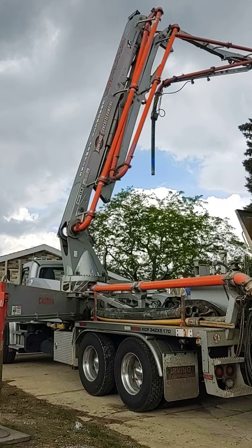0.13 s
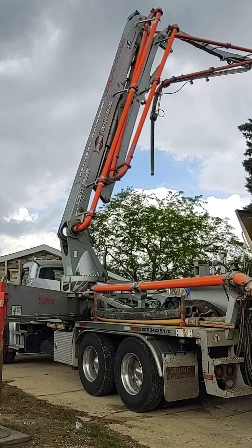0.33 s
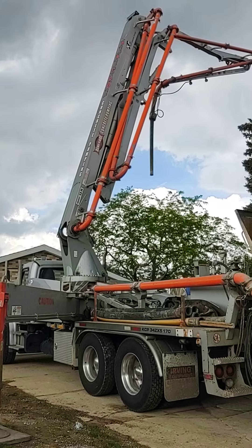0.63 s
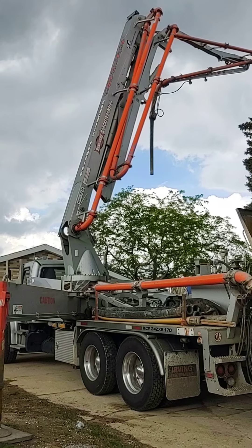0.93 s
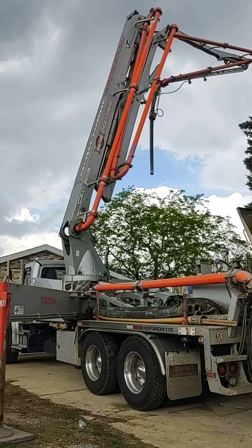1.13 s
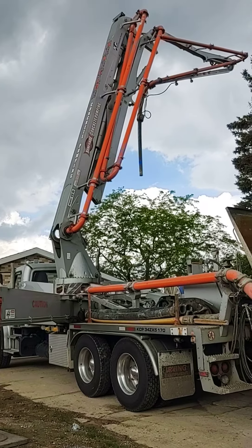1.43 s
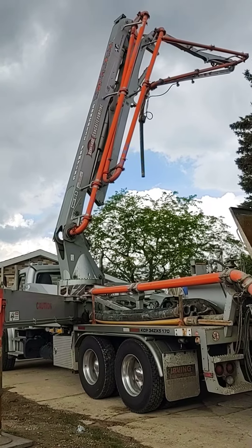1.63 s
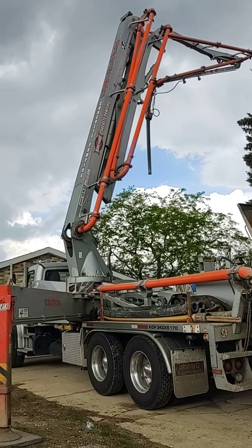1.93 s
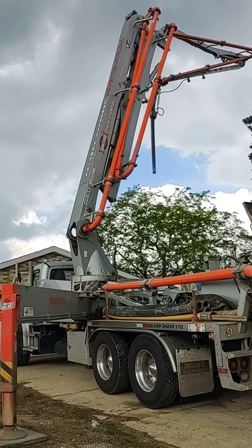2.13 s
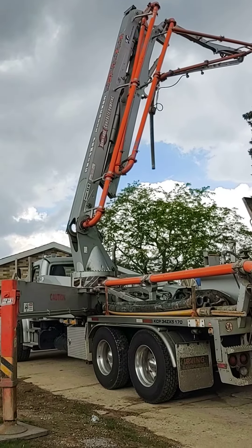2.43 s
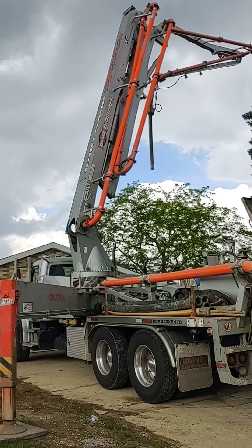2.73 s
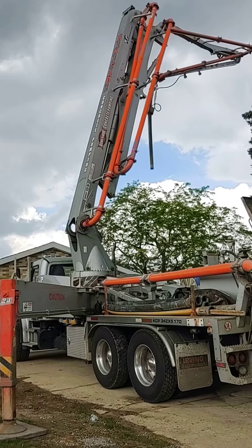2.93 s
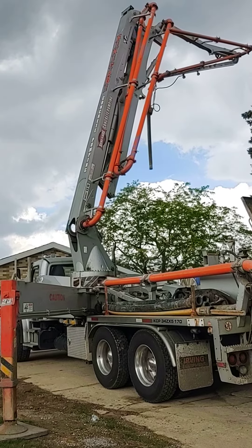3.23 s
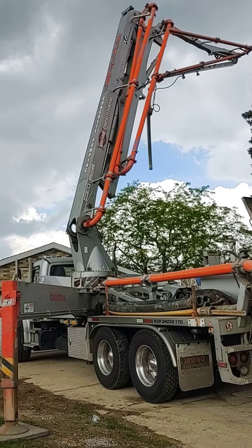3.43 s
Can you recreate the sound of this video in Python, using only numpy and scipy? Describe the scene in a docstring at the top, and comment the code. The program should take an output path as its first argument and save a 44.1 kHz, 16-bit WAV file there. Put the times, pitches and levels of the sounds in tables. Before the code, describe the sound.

Steady diesel machinery drone from a pump truck swells quickly, whines and hisses, then eases off.

```python
"""A droning diesel with whines, roar and oil hiss starts abruptly but low, swells, peaks and settles.
A pump truck stands a few metres from a phone, its six-cylinder engine held at a nearly steady speed.
Engine hum, oil pump and gear pair are sine waves locked to the engine cycle; clatter is noise repeated
each cycle. Machinery roar, fan and valve are shaped noise; the wind is noise with its treble removed."""
import sys
import numpy as np
from scipy import signal
from scipy.fft import rfft, irfft, next_fast_len
from scipy.io import wavfile

SR = 44100
rng = np.random.default_rng(int(sys.argv[2]) if len(sys.argv) > 2 else 0)


def wav_out(sig):
    """Save sig, one row per channel (or a flat mono array), as 16-bit PCM at SR to the path in sys.argv[1]."""
    wavfile.write(sys.argv[1], SR, np.round(np.clip(np.atleast_2d(sig).T, -1, 1) * 32767).astype(np.int16))


N = 157437

CYCLE_HZ = 8.3762  # engine cycles a second; one cycle is two crank turns
START_S = .1  # silence before this time

# How loud the main layers are over time; fan and hiss are trimmed later, bass counts against its mean:
# (time [s], machine and wind [dB], bass against machine [dB], fan roar [dB], valve hiss [dB])
LEVELS = [(.1, -46, 5, -56, -61), (.115, -37, -3, -49.5, -52), (.21, -28.5, -7.5, -42.5, -41),
          (.38, -21.5, -7, -36.5, -35.5), (.6, -24.5, -5.5, -40, -35.5), (.81, -26.5, -2, -47, -34.5),
          (1.08, -29, -2.5, -41, -37.5), (1.4, -30, 0.5, -53, -36.5), (1.7, -30.5, -1.5, -49.5, -37.5),
          (1.95, -31, -3, -49, -40), (2.15, -30.5, -4.5, -48.5, -42.5), (2.35, -31, -5, -45, -48.5),
          (2.7, -31, -5, -46.5, -54), (3.1, -31.5, -5, -46, -51), (3.57, -33, 1, -46, -58)]
# How the tone colour changes over time:
# (time [s], opening-valve hiss [dB], upper gear whine against machine [dB],
#  band near 350 Hz against machine [dB])
COLOURS = [(.1, -50.5, 7, -15), (.2, -40, 0.5, -4), (.4, -33.5, -0.5, -5.5), (.68, -37, 3.5, -2.5),
           (.78, -43, 3, -2), (1., -51, 1, -1), (1.4, -60, -0.5, 4), (1.9, -64, 2.5, 1), (2.4, -73, 2, -5),
           (2.9, -58, -3, -1), (3.57, -68, 1, 1)]


def undb(db):
    """Turn decibels into a plain gain."""
    return 10 ** (np.asarray(db) / 20)


def curve(table, hz):
    """Read a table of (frequency [Hz], value) between its points, on a log frequency axis."""
    points = np.array(table)
    return np.interp(np.log(np.maximum(hz, 1)), np.log(points[:, 0]), points[:, 1])


def track(column, table=LEVELS):
    """Read one column of a table over time, giving a value for every sample."""
    points = np.array(table)
    return np.interp(np.arange(N) / SR, points[:, 0], points[:, column])


def walk(rate_hz):
    """Random levels, rate_hz of them a second, joined by smooth steps; their spread is near 1."""
    at = np.arange(0, N + 64, 64) * rate_hz / SR  # worked out every 64 samples
    k = at.astype(int)
    level = rng.standard_normal(int(at[-1]) + 2)
    step = .5 - .5 * np.cos(np.pi * (at - k))
    smooth = level[k] * (1 - step) + level[k + 1] * step
    return 1.2 * np.interp(np.arange(N) * rate_hz / SR, at, smooth)


def drift_db(hz):
    """Bass and the band near 350 Hz rise and fall against the rest; above 500 Hz nothing drifts."""
    if hz > 500:
        return 0
    low = np.clip(1 - np.log2(hz / 150), 0, 1)
    mid = np.clip(1 - 2 * abs(np.log2(hz / 350)), 0, 1)
    bass_db = track(2)
    return low * (bass_db - np.mean(bass_db)) + mid * track(3, COLOURS)


def tone(turns, order, db, pan_db):
    """A sine wave at a multiple of the engine cycle, its level wavering."""
    lag_s = 5e-5  # the left side hears each tone this much later, besides the lag between the ports
    side = np.array([[-.5], [.5]])  # left, right
    phase = 2 * np.pi * (order * (turns + side * lag_s * CYCLE_HZ) + rng.random())
    waver_db = 1. * walk(3)
    db = db + waver_db + drift_db(order * CYCLE_HZ)
    return np.sin(phase) * undb(db) * undb(-side * pan_db)


def noise(gain_of_hz, low_hz, top_hz, source=None):
    """Stereo noise of rms 1, partly shared by both sides, flickering in bands half an octave apart."""
    # How alike the two sides are: (frequency [Hz], share of power common to both [0-1])
    likeness = [(60, .995), (200, .99), (350, .84), (600, .91), (1200, .75), (2200, .45), (4000, .33),
                (15000, .33)]
    # Left-right balance: (frequency [Hz], left minus right [dB])
    balance = [(60, -2), (110, -1), (200, -4.5), (380, 5.5), (700, 1.5), (1290, -3), (2380, -8.5),
               (4400, -2), (8120, -4.0), (15000, -2)]
    size = next_fast_len(N)
    hz = np.arange(size // 2 + 1) * SR / size
    raw = rng.standard_normal((3, N)) if source is None else source
    spectrum = rfft(raw, size)
    # One shared noise plus a separate noise for each side
    like = np.clip(curve(likeness, hz), 0, 1)
    stereo = np.sqrt(like) * spectrum[0] + np.sqrt(1 - like) * spectrum[1:]
    stereo = stereo * gain_of_hz(hz)
    stereo = stereo * undb(np.array([[.5], [-.5]]) * curve(balance, hz))
    out = 0
    swell_db = .4 * walk(3.06)  # all bands together
    for centre in low_hz * 2 ** np.arange(0, np.log2(top_hz / low_hz), .5):
        band = np.cos(np.pi / 2 * np.clip(2 * np.log2((hz + 1) / centre), -1, 1)) ** 2
        flicker_db = .9 * walk(8.98)  # each band on its own
        band_sound = irfft(stereo * band, size)[:, :N]
        out = out + band_sound * undb(swell_db + flicker_db + drift_db(centre))
    return out / np.sqrt(np.mean(out ** 2))


def peaks(rows):
    """Gain over frequency of resonances given as (frequency [Hz], width [Hz], level [dB])."""
    def gain(hz):
        power = sum(undb(2 * db) / (1 + (2 * (hz - f) / width) ** 2) ** 2 for f, width, db in rows)
        return np.sqrt(power)
    return gain


def engine_hum(turns):
    """Exhaust and block hum at whole multiples of the engine cycle."""
    # Hum lines: (multiple of the engine cycle, level before trim [dB], left minus right [dB])
    orders = [(6, -33, 0), (9, -27, 0), (12, -7, 1), (14, -14, 0), (15, -12, 1), (18, -5, 1), (20, -15, 0),
              (21, -20, 0), (24, -11, 0), (26, -20, 1), (30, -12, 1), (36, -20, 3), (38, -15, 3),
              (39, -18, 3), (40, -16, 2), (42, -16, 4), (47, -20, 3), (60, -17, -6), (64, -22, -3),
              (70, -20, -3), (72, -18, -3), (76, -15, -1), (78, -10, -1), (84, -6, 0), (85, -15, 0),
              (88, -18, 2), (96, -19, 0), (106, -20, 3), (120, -27, 0), (141, -23, -2)]
    trim_db = -1
    return sum(tone(turns, k, db + trim_db, pan) for k, db, pan in orders)


def pump_whine(turns):
    """A nine-piston oil pump, geared to the engine, whines at multiples of its shaft speed."""
    # Pump lines: (multiple of the pump shaft, level before trim [dB], left minus right [dB])
    orders = [(7, -15, 0), (18, -11, 5), (27, -8, -3), (35, -11, -1), (36, -3, -1), (45, -18, 1),
              (180, -27, -4)]
    shaft_ratio, trim_db = 2.5, -.5  # pump turns per engine cycle; trim
    return sum(tone(turns, k * shaft_ratio, db + trim_db, pan) for k, db, pan in orders)


def gear_whine(turns):
    """Meshing gear teeth whine at multiples of the tooth rate, with a sideband on either side."""
    # Gear lines: (multiple of the tooth rate, level [dB],
    #  sidebands one crank turn away against that level [dB], left minus right [dB])
    mesh = [(1, -4.5, -18.5, -3), (2, -5, -13, 0.5), (3, -12.5, -12.5, 5.5), (4, -22, -5, 8.5)]
    teeth_per_cycle = 80
    out = 0
    for k, db, side_db, pan in mesh:
        for step in (-1, 0, 1):
            # Only lines above the first follow the upper-whine track and its rough flutter
            rough_db = 1.2 * walk(25)
            upper_db = (track(2, COLOURS) + rough_db) * (round(k) > 1)
            order = round(k) * teeth_per_cycle + 2 * step
            out = out + tone(turns, order, db + side_db * abs(step) + upper_db, pan)
    return out


def clatter_and_roar(turns):
    """Clatter is noise repeating every engine cycle; roar has the same colour but never repeats."""
    # Colour of both noises: (frequency [Hz], noise level per Hz [dB])
    colour = [(18, -68), (30, -42), (79, -13), (124, -19), (287, -8), (380, -8.5), (458, -14.5),
              (665, -4.5), (758, -4), (1020, -15), (1260, -10.5), (1330, -12), (1540, -15.5), (1790, -17.5),
              (2000, -12.5), (2240, -22), (2600, -25.5), (3380, -50), (5720, -120)]
    clatter_db, roar_db = -9.5, -5
    shape = lambda hz: undb(curve(colour, hz))
    # One stored cycle of noise, read again and again in step with the engine
    cycle = rng.standard_normal((3, 8192))[:, (turns % 1 * 8192).astype(int)]
    clatter = noise(shape, 60, 3500, cycle)
    roar = noise(shape, 60, 3500)
    return undb(clatter_db) * clatter + undb(roar_db) * roar


def machine():
    """Hum, whines, clatter and roar all follow one machine level; the engine speed wanders slightly."""
    speed = 1 + .0003 * walk(1.5)
    turns = np.cumsum(speed) * CYCLE_HZ / SR  # engine cycles so far
    tones = engine_hum(turns) + pump_whine(turns) + gear_whine(turns)
    return (tones + clatter_and_roar(turns)) * undb(track(1))


def fan():
    """The cooling fan's broad air roar, made from shaped noise."""
    # Colour of the air noise: (frequency [Hz], noise level per Hz [dB])
    colour = [(1290, -13), (2200, -11.5), (2630, -3.5), (2900, -1.5), (3190, -3.5), (4340, -11.5),
              (8150, -9.5), (11800, -16), (12800, -18), (15200, -24.5)]
    trim_db = 4
    air = noise(lambda hz: undb(curve(colour, hz)), 1600, 20000)
    return air * undb(track(3) + trim_db)


def valve():
    """Oil hiss coloured by the pipes, with a brighter jet while the valve opens."""
    # Pipe resonances in the hiss: (frequency [Hz], width [Hz], level [dB])
    pipes = [(2970, 140, 1), (3350, 450, -7), (3950, 500, -5), (4850, 350, -6), (5800, 300, -7),
             (6900, 650, -4), (7800, 400, -5.5), (8800, 450, -10), (10300, 1500, -16), (12600, 150, -18)]
    # Resonances of the opening jet: (frequency [Hz], width [Hz], level [dB])
    opening = [(5250, 520, 0), (5570, 91, 5.5), (5840, 180, 3), (8700, 5300, -12.5), (10900, 2600, -22)]
    broad = (5100, 3900, -10.5)  # one wide resonance under the pipes, same columns
    trim_db, pan_db = 2.5, -1  # hiss trim; left minus right, added to the noise's own balance
    flow = noise(peaks(list(pipes) + [broad]), 1600, 20000)
    jet = noise(peaks(opening), 4000, 20000)
    pan = undb(np.array([[.5], [-.5]]) * pan_db)
    return (flow * undb(track(4) + trim_db) + jet * undb(track(1, COLOURS))) * pan


def wind():
    """Faint deep rumble, mostly the same left and right, rising and falling with the machine."""
    mean_db, side_db = -58, -12  # average level; left-right difference against the shared part
    low_pass = signal.butter(2, 40, fs=SR, output="sos")
    mid, side = signal.sosfilt(low_pass, rng.standard_normal((2, N)))
    rumble = mid + undb(side_db) * side * np.array([[1], [-1]])
    level_db = track(1)
    return rumble / np.std(rumble) * undb(mean_db + level_db - np.mean(level_db))


def scene():
    """All the sources together, silent until the start time."""
    return (machine() + fan() + valve() + wind()) * (np.arange(N) / SR > START_S)


def record(dry):
    """The left port hears everything a little late; the phone cuts the deep bass and the top."""
    lag = 6  # samples
    left = np.roll(dry[0], lag) * (np.arange(N) >= lag)
    x = np.array([left, dry[1]])
    x = signal.sosfilt(signal.butter(2, 50.6, "high", fs=SR, output="sos"), x)
    return signal.sosfilt(signal.ellip(14, .3, 60, 15050, fs=SR, output="sos"), x)


dry = scene()
out = record(dry)
wav_out(out)
```